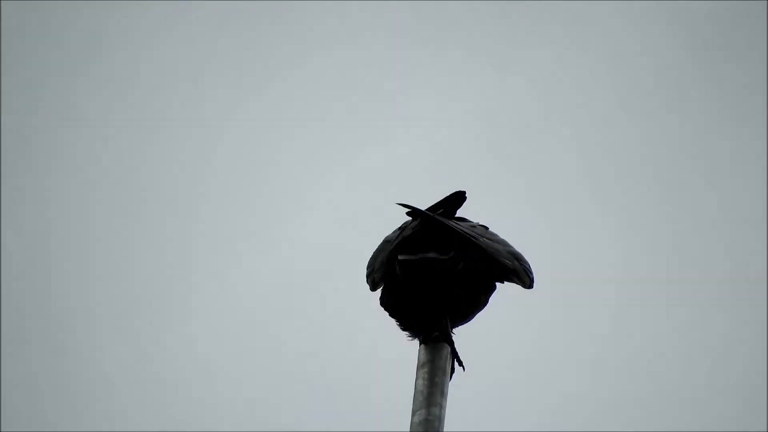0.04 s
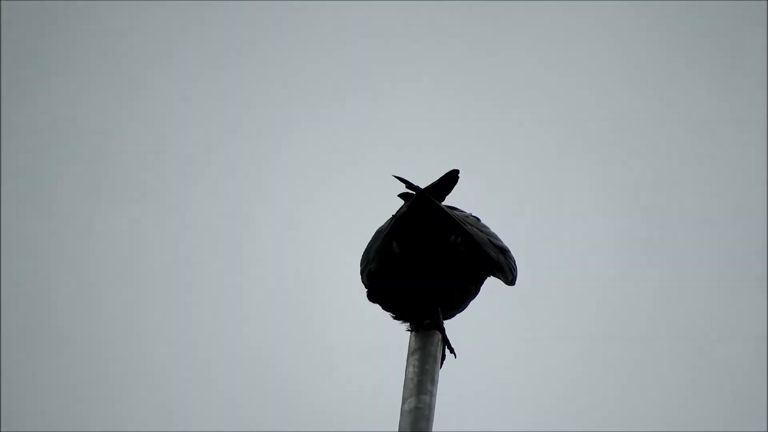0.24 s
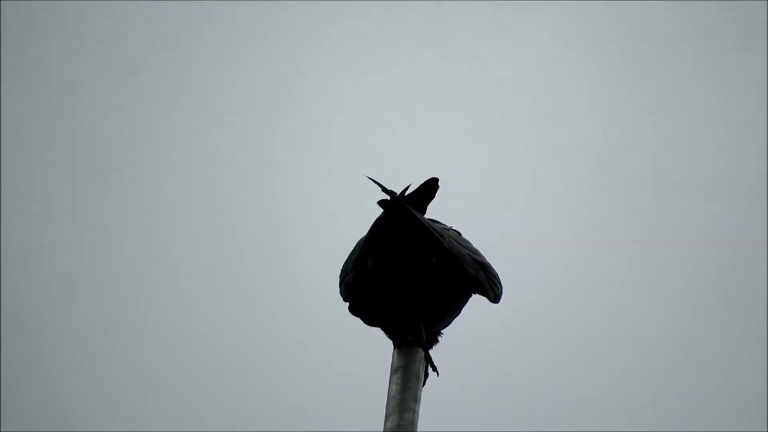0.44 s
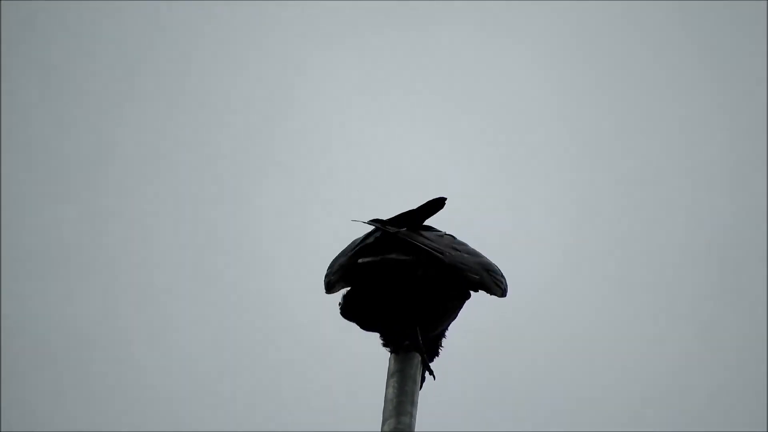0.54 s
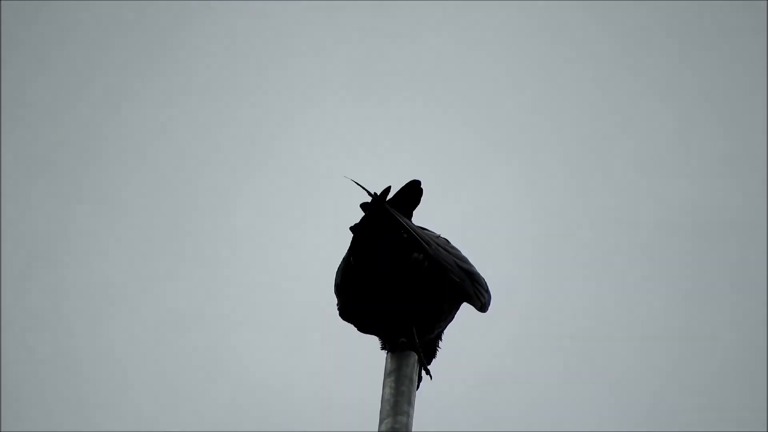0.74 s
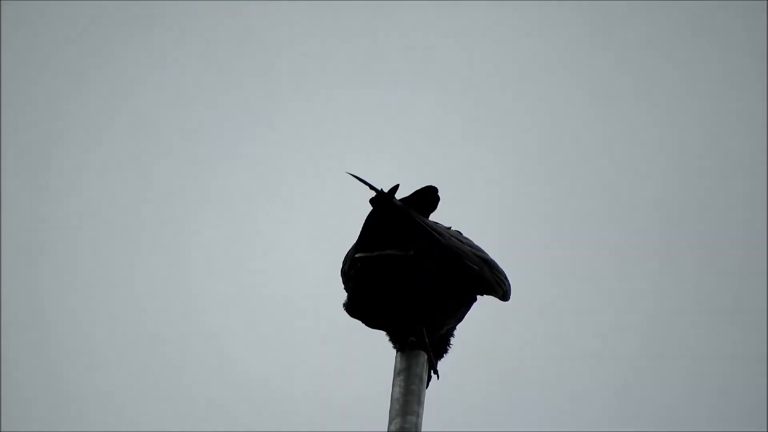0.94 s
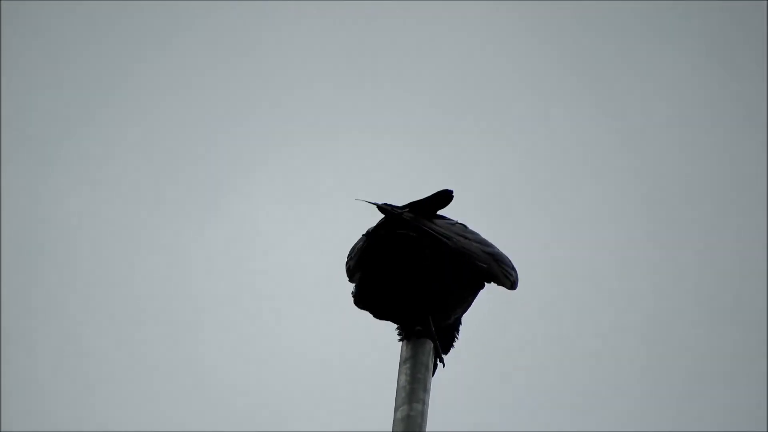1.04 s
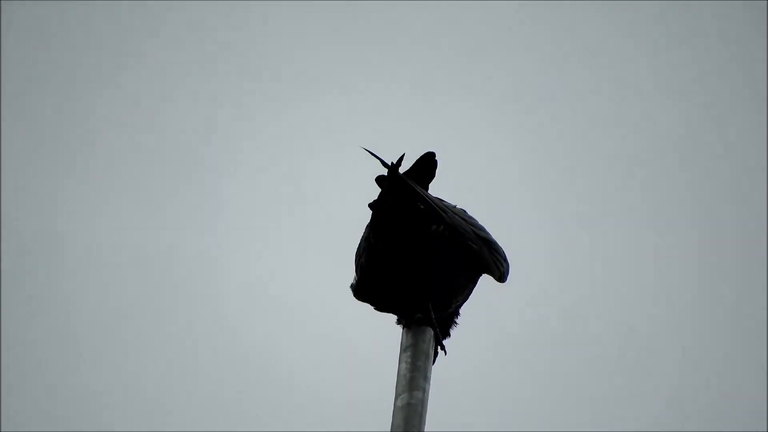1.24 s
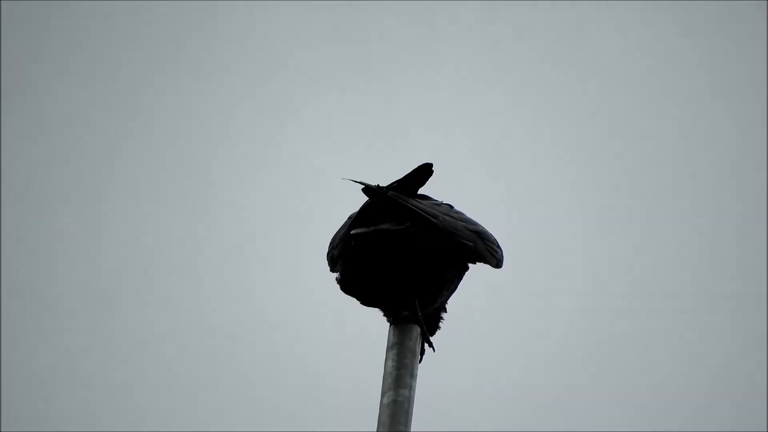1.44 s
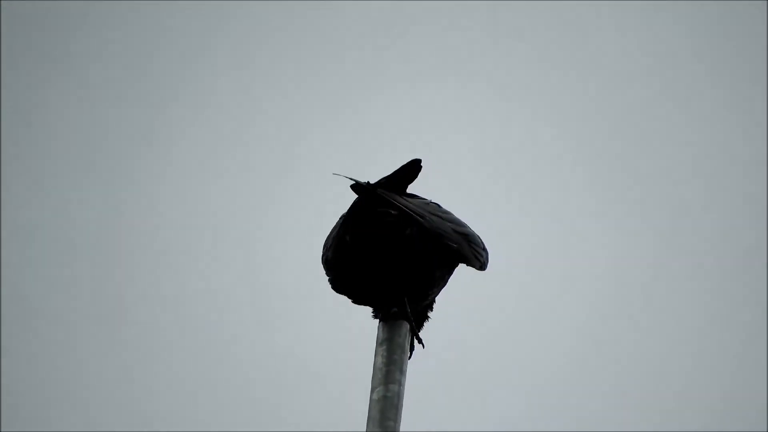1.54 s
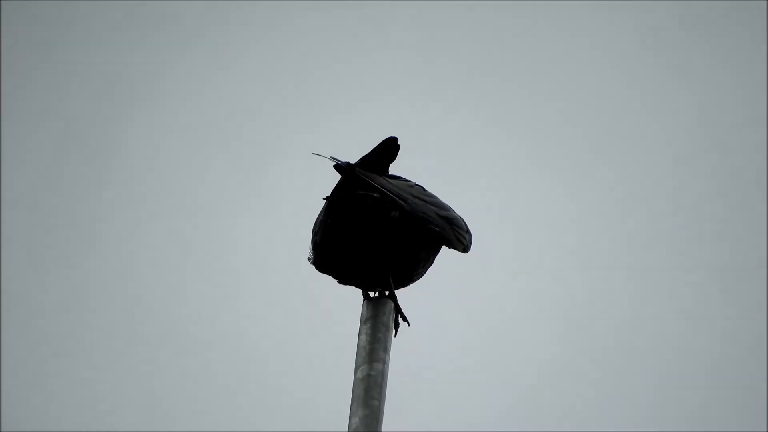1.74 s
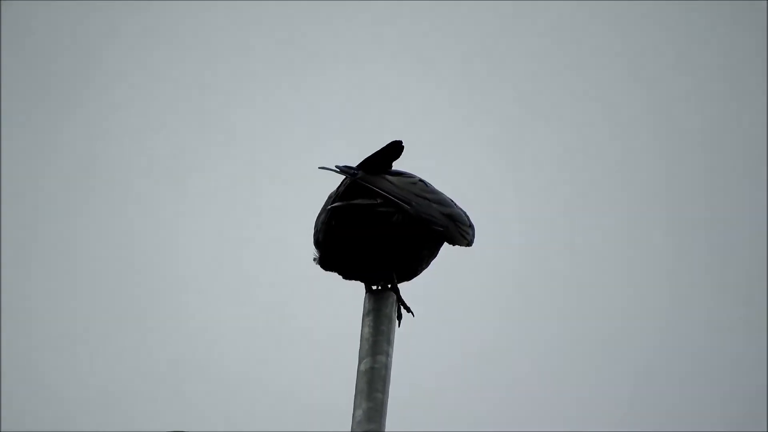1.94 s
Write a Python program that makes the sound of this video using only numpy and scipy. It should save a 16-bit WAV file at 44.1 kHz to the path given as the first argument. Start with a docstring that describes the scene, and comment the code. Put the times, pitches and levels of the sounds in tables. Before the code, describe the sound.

A raven croaks hoarsely four times outdoors over steady wind.

```python
"""Wind rumbles and hisses in the open air, and almost at once a raven on a pole gives four hoarse croaks.
Each swells as two membranes beat, their second harmonics on the throat resonance, then breaks into a
lower, flaring finish. The surroundings echo it. Feathers rustle once after the third croak, a small
bird whistles thinly far off towards the end, and the wind runs underneath throughout."""
import sys
import numpy as np
from scipy import signal
from scipy.fft import rfft, irfft
from scipy.io import wavfile
from scipy.ndimage import map_coordinates

SR = 44100
rng = np.random.default_rng(int(sys.argv[2]) if len(sys.argv) > 2 else 0)


def master_out(mix):
    """Clip the mix to full scale and print it as 16-bit PCM to the path in sys.argv[1]."""
    frames = np.transpose(np.atleast_2d(mix))
    ceiling = np.clip(frames, -1, 1)
    pcm = np.round(ceiling * 32767).astype(np.int16)
    wavfile.write(sys.argv[1], SR, pcm)


N = 88200

# Tone of the wind common to both sides: f/Hz, relative level/dB
WIND_MID_TONE = [(20, -30), (40, -12), (60, -1), (120, -0.5), (190, 4.5), (280, -8), (500, -9), (900, -5.5),
                 (2000, -15.5), (3000, -16.5), (3800, -14.5), (5500, -16.5), (7500, -18), (10000, -22.5),
                 (15500, -34.5)]
# Tone of the wind that differs between the sides: f/Hz, relative level/dB
WIND_SIDE_TONE = [(18, -52), (30, -20), (81, -7), (156, -3.5), (208, 0), (243, -10.5), (532, -10.5),
                  (709, -9), (945, -10.5), (1050, -12), (2760, -14.5), (8060, -13), (15500, -31.5)]
# Stereo lean of the wind: f/Hz, left minus right/dB
WIND_BALANCE = [(60, 4.5), (110, -0.5), (200, 3.5), (380, 0.5), (700, 2.5), (1290, 0.5), (2380, 0),
                (4400, 3), (8120, 1.5), (15000, 0)]
# Gusts riding the rumble: t/s, level/dB
GUSTS = [(0, 3), (.37, -1.5), (.55, 0.5), (.7, 0), (.92, -3.5), (1.09, 4), (1.22, -2.5), (1.36, 1),
         (1.6, 1.5), (1.8, 0.5), (2, 2)]
# The small bird's notes: start t/s, length/s, first f/Hz, last f/Hz, level/dB
WHISTLES = [(1.443, 0.166, 7460, 7580, -54), (1.549, 0.17, 7570, 7150, -57.5),
            (1.699, 0.072, 6870, 7340, -50.5), (1.726, 0.13, 7490, 7420, -57),
            (1.738, 0.11, 6680, 6020, -55), (1.842, .13, 6990, 6020, -58.5), (1.92, 0.047, 7560, 7630, -52)]
# Tone of the rustling feathers: f/Hz, relative level/dB
FEATHER_TONE = [(1500, -50), (2800, -2), (3700, 7), (5500, 3), (8500, 1), (12000, -13), (16000, -55)]
# Single reflections from the surroundings: delay/s, level/dB
ECHOES = [(0.014, -18), (.036, -16.5), (.064, -25.5), (.105, -27), (.185, -31)]
# Colour of the scattered sound: f/Hz, gain/dB
SCATTER_EQ = [(500, -6.5), (650, 0), (1050, -1.5), (1200, -3.5), (1300, 3.5), (1400, 4.5), (1700, 2),
              (2200, 4.5), (4300, 8.5)]
# Tone of the croak: throat and beak resonances, with comb notches from a close reflection: f/Hz, gain/dB
CROAK_EQ = [(250, -61), (450, -40), (590, -25.5), (640, -25), (700, -20), (820, -23.5), (900, -18),
            (960, -21.5), (1040, -5), (1110, -11), (1175, 1), (1245, -2), (1305, -2.5), (1365, 1),
            (1490, -14.5), (1580, -14.5), (1690, -21), (1830, -47), (2450, -45.5), (3000, -49),
            (3650, -42.5), (4400, -42), (6000, -59), (12000, -69)]
# Brief cracks in the voice: centre t/s, half width/s, f/Hz, pre-EQ level/dB
CRACKS = [(0.243, 0.01, 690, -31), (.357, 0.014, 385.7, -28.5), (.678, 0.013, 685, -48),
          (.724, 0.013, 705, -32), (1.128, 0.017, 690, -38.5), (1.172, 0.029, 685, -29),
          (1.726, 0.0046, 501, -30.5)]
# The croaks: start t/s, time to the break/s, time to full effort/s, pre-EQ level/dB,
# swell/dB, roughness/0-1, lead-in/s, relative chest tone/dB, relative low register/dB
CROAKS = [(0.197, .125, 0.092, -16.5, 10, .42, 0.0086, -4, -4),
          (.653, 0.14, 0.13, -19, 9, 0.58, .013, -4, -3.5),
          (1.098, .141, 0.12, -17.5, 12.5, .5, 0.0058, -5, -6),
          (1.582, .119, 0.11, -22, 4.5, 0.52, 0.031, 1, -5.5)]

WIND_MID_DB, WIND_SIDE_DB, WIND_FLICKER_DB = -49, -53, 1.2
WHISTLE_WARBLE, WHISTLE_WARBLE_HZ, WHISTLE_WET_DB, WHISTLE_PAN_DB = .034, 600, -1, 8
RUSTLE_AT_S, RUSTLE_WIDTH_S, RUSTLE_DB, RUSTLE_PAN_DB = 1.31, .068, -50, 8
GROUND_T60_S, GROUND_DB = .76, -14.5  # scatter from the ground and things close by
FAR_T60_S, FAR_DB = 1.88, -22.5  # scatter from the far surroundings
SWAY_RAD, SWAY_HZ = .8, 170  # moving air shakes the phase of the tails
RAVEN_PAN_DB, SCATTER_WIDTH = 1.0, .18

PITCH_HZ, SCOOP_HZ, SCOOP_S = 623, 16, .0242  # the pitch starts a scoop under and settles
SAG_HZ_PER_S, SAG_LEAD_S = 1453, .0095  # it starts to fall just before the break
WANDER, WANDER_HZ = .016, 55
LEAD_IN_DB, RELEASE_DB_PER_S = 24, 797  # rise during the lead-in; fade after the break
SECOND_RATIO, SECOND_DB = .942, -9  # the second membrane against the first
CHEST_RATIO, CHEST_ROUGH = .972, .35
CHEST_FADE_S = .16  # the fundamental is strongest while the beak is still opening
LOW_HZ, LOW_RISE_HZ_PER_S, LOW_SINK_HZ_PER_S, LOW_SINK_DB = 526, 1500, 3000, -1
LOW_LEAD_S, LOW_ATTACK_S, LOW_RELEASE_S = .001, .011, .028
LOW_ROUGH, CRACK_ROUGH = .31, .42
# Hoarseness: these depths and the rasp are scaled by roughness.
JITTER, JITTER_HZ = .04563, 338.5
SHIMMER_DB, SHIMMER_HZ, RASP_DB = 3.8, 120, -5.5
FLUTTER_DEPTH, FLUTTER_HZ, FLUTTER_SCATTER = .36, 150, .2523
TOP_HZ = 15700


def undb(db):
    """Decibels to gain."""
    return 10 ** (np.asarray(db) / 20)


def unit(x):
    """Scale to rms 1."""
    return x / np.sqrt(np.mean(x ** 2))


def pan(x, db):
    """Place a sound by its left minus right level."""
    return x * undb(np.array([[db], [-db]]) / 2)


def wobble(hz):
    """Smooth, bounded random modulation: hz new values a second, spread near 1."""
    at = np.arange(N) * hz / SR
    return 2 * np.tanh(map_coordinates(rng.standard_normal(4096), [at], order=3, mode="wrap") / 2)


def eq_curve(points, size):
    """Gain on every frequency bin from points of f/Hz, level/dB."""
    hz, db = np.array(points).T
    bin_hz = np.arange(size // 2 + 1) * SR / size
    return undb(np.interp(np.log(bin_hz + 1), np.log(hz), db))


def coloured_noise(tone, shape=N):
    """Steady noise with the given tone, at rms 1."""
    return unit(irfft(rfft(rng.standard_normal(shape)) * eq_curve(tone, N), N))


def resonate(x, points, size=4096):
    """Minimum-phase EQ: its peaks ring only after the sound that excites them."""
    cepstrum = irfft(np.log(eq_curve(points, size)))
    cepstrum[1:size // 2] *= 2
    cepstrum[size // 2 + 1:] = 0
    impulse = irfft(np.exp(rfft(cepstrum)))
    return signal.fftconvolve(x, impulse)[:N]


def wind():
    """The bed: a gusty, flickering low rumble under a smooth, wide hiss."""
    mid = undb(WIND_MID_DB) * coloured_noise(WIND_MID_TONE)
    side = undb(WIND_SIDE_DB) * coloured_noise(WIND_SIDE_TONE)
    air = mid + side * np.array([[1], [-1]])
    rumble = signal.sosfiltfilt(signal.butter(2, 500, fs=SR, output="sos"), air)
    gust_db = np.interp(np.arange(N) / SR, *np.array(GUSTS).T) + WIND_FLICKER_DB * wobble(hz=13)
    air = air + rumble * (undb(gust_db) - 1)
    balance = eq_curve(WIND_BALANCE, N) ** np.array([[.5], [-.5]])
    return irfft(rfft(air) * balance, N)


def outdoor_reverb(x, width, t60):
    """Diffuse stereo tail of the surroundings, blurred in pitch by the moving air."""
    tails = rng.standard_normal((2, N)) * np.exp(-np.log(1000) * np.arange(N) / SR / t60)
    wet = [signal.fftconvolve(x, unit(tail) / np.sqrt(N))[:N] for tail in tails]
    mid, side = (np.real(signal.hilbert(w) * np.exp(1j * SWAY_RAD * wobble(SWAY_HZ))) for w in wet)
    return mid + width * side * np.array([[1], [-1]])


def small_bird():
    """Thin, buzzy gliding whistles, blurred by distance."""
    song = 0
    for start, length, first_hz, last_hz, db in WHISTLES:
        progress = np.clip((np.arange(N) / SR - start) / length, 0, 1)
        glide_hz = first_hz + (last_hz - first_hz) * progress
        hz = glide_hz * (1 + WHISTLE_WARBLE * wobble(WHISTLE_WARBLE_HZ))
        song = song + undb(db) * np.sin(np.pi * progress) * np.sin(2 * np.pi * np.cumsum(hz) / SR)
    wet = undb(WHISTLE_WET_DB) * outdoor_reverb(song, width=1, t60=FAR_T60_S)
    return pan(song + wet, WHISTLE_PAN_DB)


def feathers():
    """One soft swish as the raven shifts its wings."""
    swish = np.exp(-.5 * ((np.arange(N) / SR - RUSTLE_AT_S) / RUSTLE_WIDTH_S) ** 2)
    return pan(undb(RUSTLE_DB) * swish * coloured_noise(FEATHER_TONE, (2, N)), RUSTLE_PAN_DB)


def membrane_phase(hz, rough):
    """Phase of a membrane whose pitch wanders and shakes."""
    unsteady = 1 + WANDER * wobble(WANDER_HZ) + rough * JITTER * wobble(JITTER_HZ)
    return 2 * np.pi * np.cumsum(hz * unsteady) / SR


def membrane(hz, rough, harmonics=14):
    """One membrane of the syrinx: an unsteady pulse train with a puff of air in each cycle."""
    phase = membrane_phase(hz, rough)
    pulses = np.sqrt(2) * sum(np.cos(k * phase) for k in range(1, harmonics + 1))
    puffs = np.sqrt(SR / 2 / hz) * (1 + np.cos(phase)) * rng.standard_normal(N)
    return pulses + undb(RASP_DB) * rough * puffs


def crack(at, width, hz, db):
    """One membrane slips to another pitch for a moment."""
    blip = np.exp(-((np.arange(N) / SR - at) / width) ** 2)
    return undb(db) * blip * membrane(hz, CRACK_ROUGH)


def low_register(t):
    """The throaty finish, peaking at t = 0: one membrane flares upward, the other sinks."""
    glide_s = np.clip(t, -.008, .03)
    rising = membrane(LOW_HZ + LOW_RISE_HZ_PER_S * glide_s, LOW_ROUGH)
    sinking_phase = membrane_phase(LOW_HZ - LOW_SINK_HZ_PER_S * glide_s, LOW_ROUGH)
    sinking = undb(LOW_SINK_DB) * np.sqrt(2) * np.cos(2 * sinking_phase)  # second harmonic only
    envelope = np.exp(-(t / np.where(t < 0, LOW_ATTACK_S, LOW_RELEASE_S)) ** 2)
    return (rising + sinking) * envelope


def croak(start, hold, rise, db, swell_db, rough, lead_in, chest_db, low_db):
    """Two membranes, one a little flat, beat and swell; the pitch sags and breaks to a low register."""
    t = np.arange(N) / SR - start
    age = np.maximum(t, 0)
    sag_s = np.clip(t - hold + SAG_LEAD_S, 0, .1)
    hz = PITCH_HZ - SCOOP_HZ * np.exp(-age / SCOOP_S) - SAG_HZ_PER_S * sag_s
    gate = undb(LEAD_IN_DB * np.minimum(t / lead_in, 0) - RELEASE_DB_PER_S * np.maximum(t - hold, 0))
    effort = undb(-swell_db * np.maximum(1 - age / rise, 0))
    membranes = membrane(hz, rough) + undb(SECOND_DB) * membrane(hz * SECOND_RATIO, rough)
    chest_tone = np.sqrt(2) * np.cos(membrane_phase(hz * CHEST_RATIO, CHEST_ROUGH))
    chest = undb(chest_db) * np.exp(-age / CHEST_FADE_S) * chest_tone
    finish = undb(low_db) * low_register(t - hold + LOW_LEAD_S)
    voice = gate * (effort * membranes + chest) + finish
    # A slower, uneven flapping of the membranes adds sidebands.
    flap_hz = FLUTTER_HZ * (1 + FLUTTER_SCATTER * wobble(hz=100))
    flutter = 1 + rough * FLUTTER_DEPTH * np.sin(2 * np.pi * np.cumsum(flap_hz) / SR)
    shimmer_db = rough * SHIMMER_DB * wobble(SHIMMER_HZ)
    return voice * undb(db + shimmer_db) * flutter


def raven():
    """The croaks, coloured by throat, beak and a close reflection, echo from near and far."""
    t = np.arange(N) / SR
    syrinx = sum(croak(*row) for row in CROAKS) + sum(crack(*row) for row in CRACKS)
    voice = resonate(syrinx, CROAK_EQ)
    echoes = sum(undb(db) * np.interp(t - delay, t, voice, left=0) for delay, db in ECHOES)
    send = resonate(voice, SCATTER_EQ)
    ground = undb(GROUND_DB) * outdoor_reverb(send, SCATTER_WIDTH, GROUND_T60_S)
    far = undb(FAR_DB) * outdoor_reverb(send, SCATTER_WIDTH, FAR_T60_S)
    return pan(voice + echoes + ground + far, RAVEN_PAN_DB)


def scene():
    """The mix: raven up front; feathers, small bird and wind behind it."""
    return raven() + feathers() + small_bird() + wind()


def record(dry):
    """A steep high cut takes off the very top."""
    return signal.sosfilt(signal.ellip(10, .2, 80, TOP_HZ, fs=SR, output="sos"), dry)


dry = scene()
out = record(dry)
master_out(out)
```